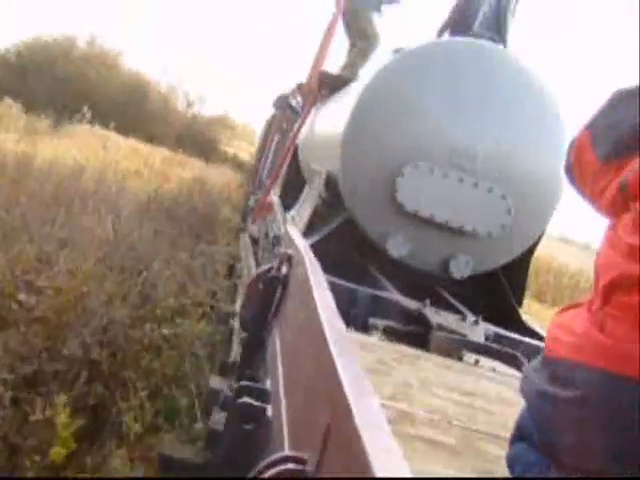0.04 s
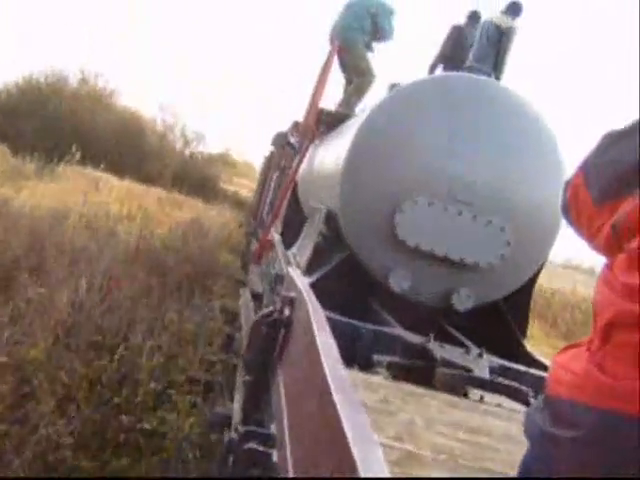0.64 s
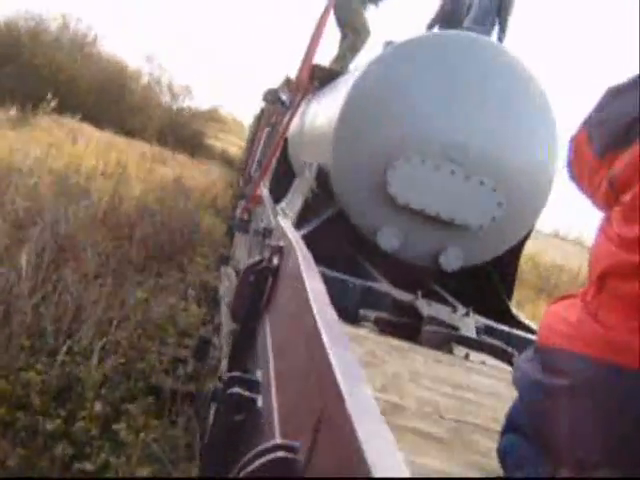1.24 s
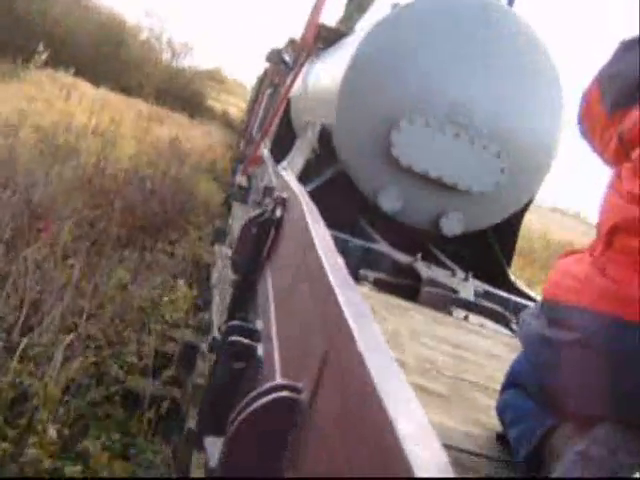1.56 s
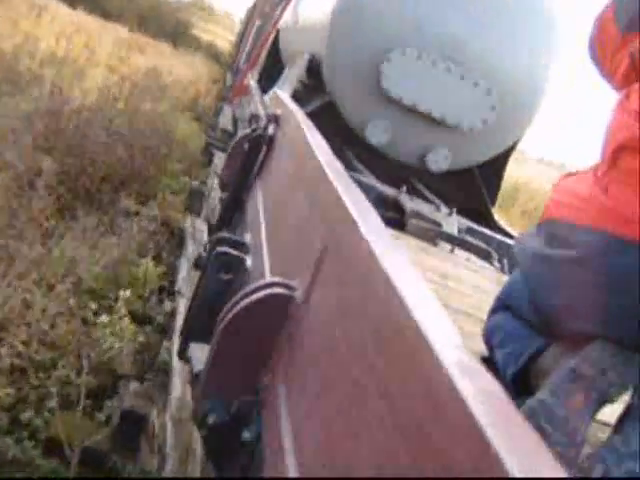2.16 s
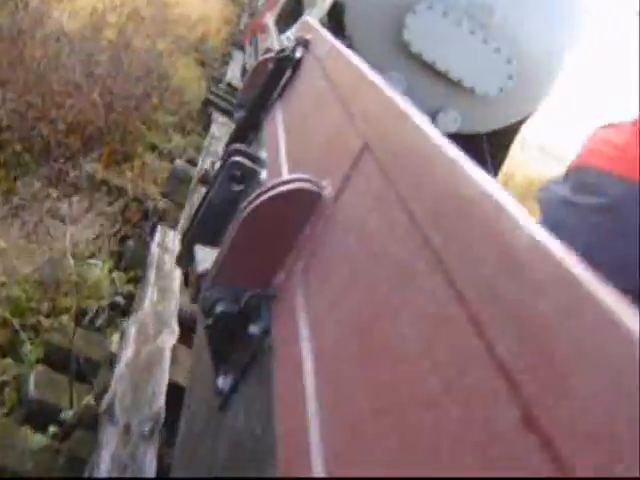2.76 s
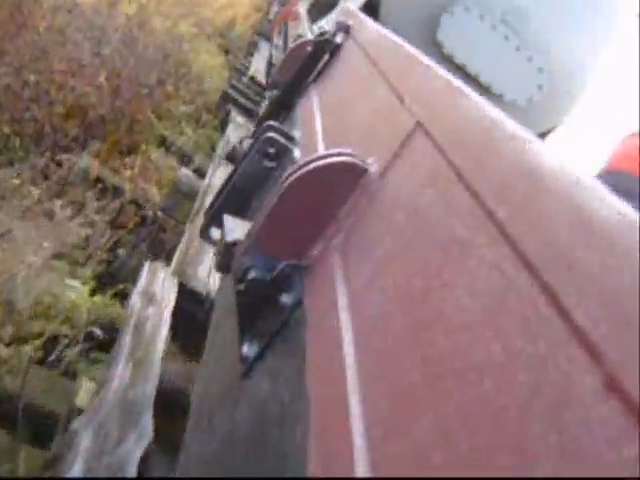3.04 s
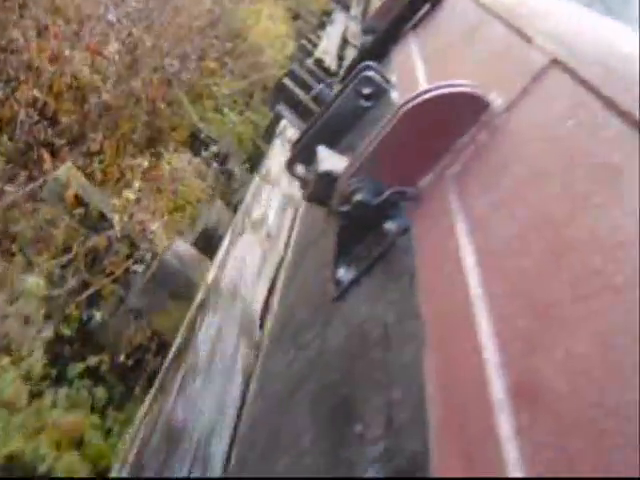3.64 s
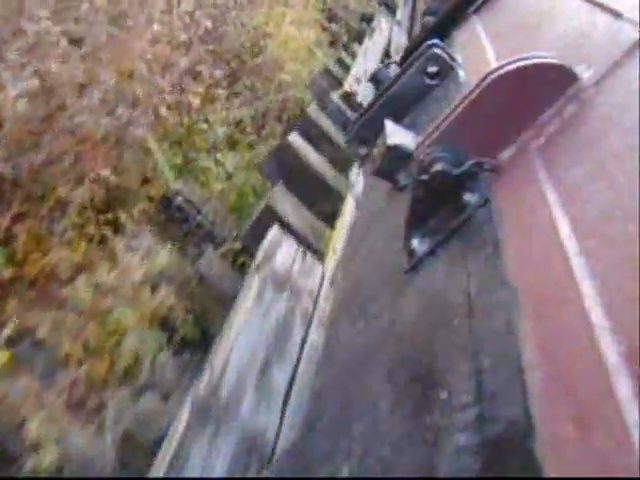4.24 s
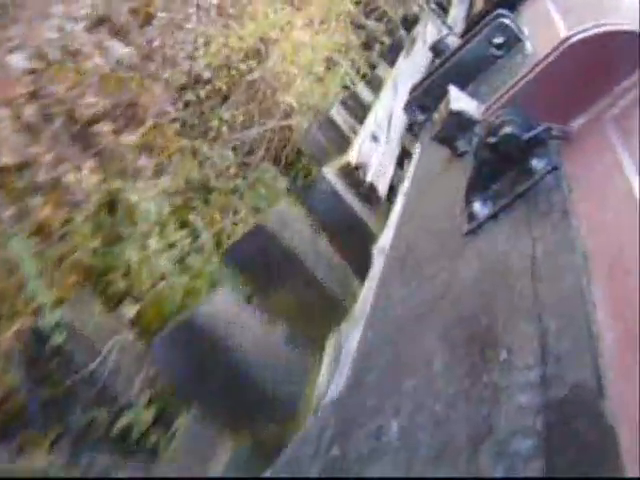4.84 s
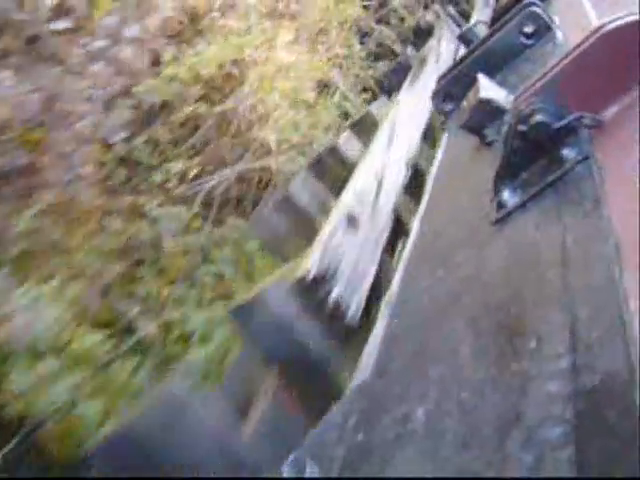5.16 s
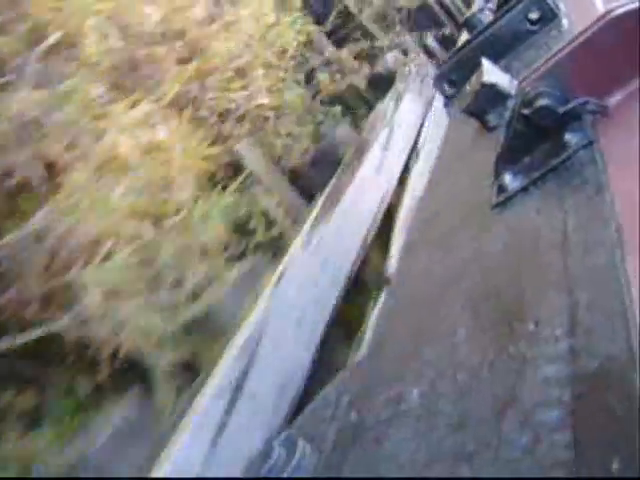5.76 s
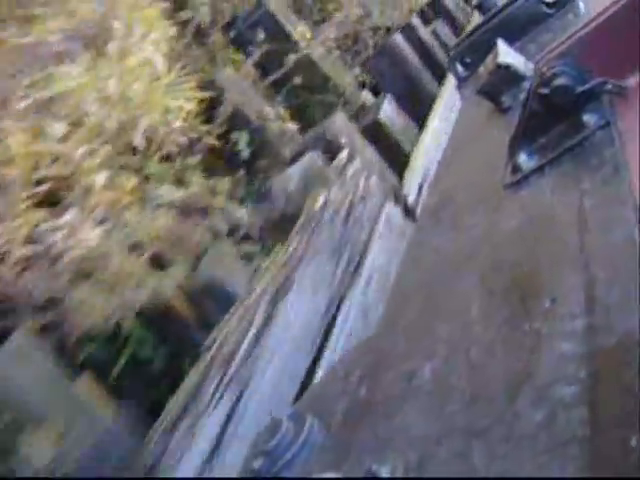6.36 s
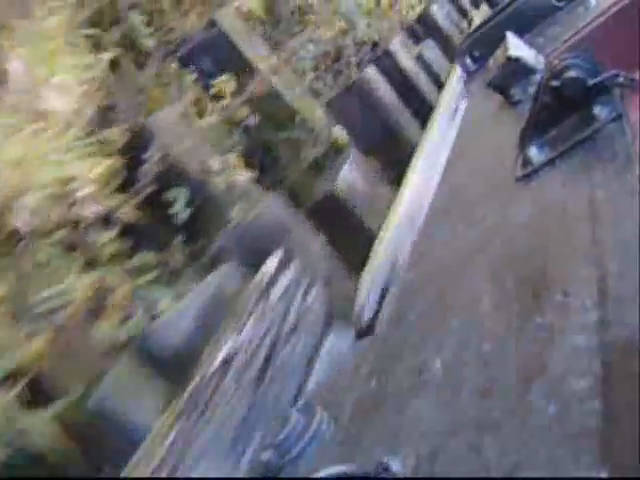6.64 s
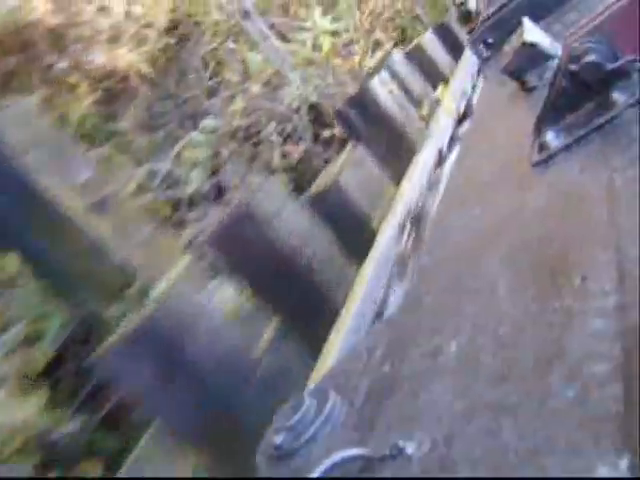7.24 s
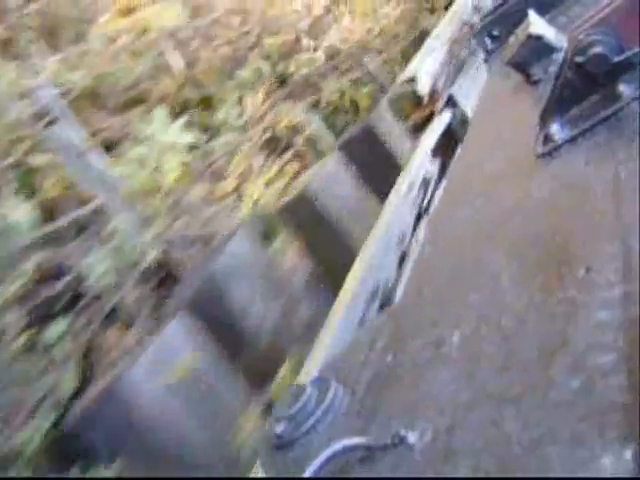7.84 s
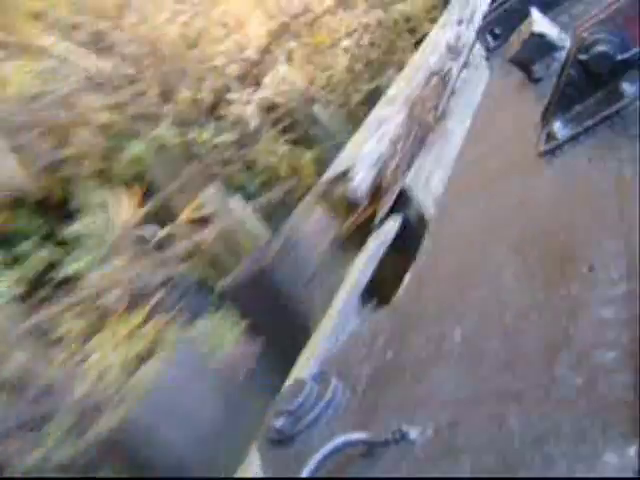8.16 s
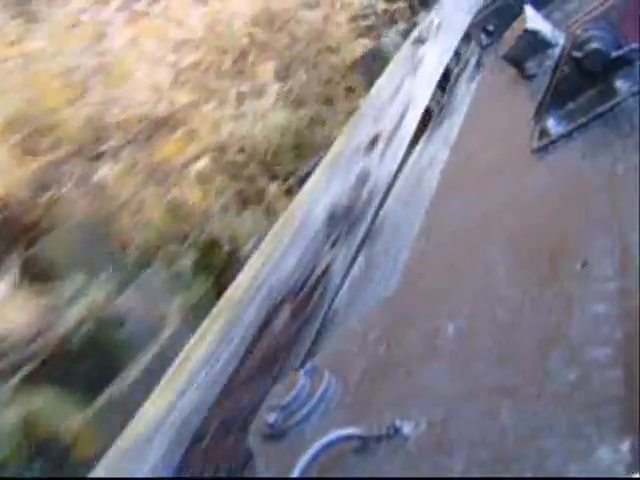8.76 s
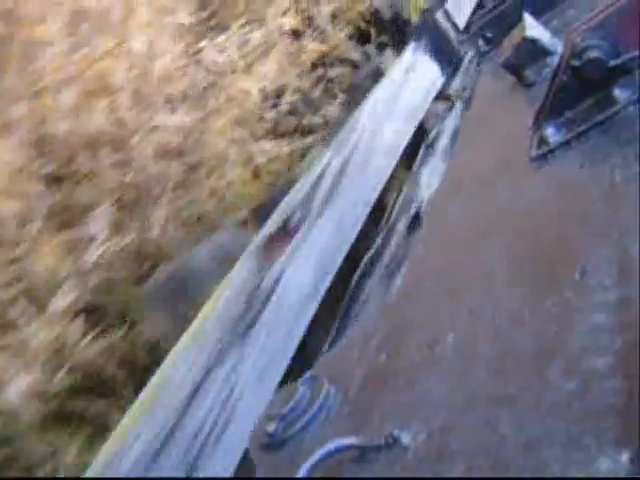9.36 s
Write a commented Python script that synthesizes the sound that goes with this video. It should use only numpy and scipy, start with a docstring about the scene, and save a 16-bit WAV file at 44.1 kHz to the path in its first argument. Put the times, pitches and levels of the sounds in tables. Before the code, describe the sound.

An open wagon rumbles loudly along worn rails, with a gritty wheel hiss, rattling steel fittings and a few sharp clicks.

```python
"""A heavy rumble, with hissing rails and chattering steel: an open wagon on a worn narrow-gauge line,
heard from its side wall above the wheels. Bumps in the rail force the wheels, frame and deck into
vibration, crushed grit hisses, flanges squeal thinly, and jolts make loose fittings ring in their modes.
A small camera's low-rate sample-and-hold adds a fizz to the rumble; a few sharp clicks cut through."""
import sys
import numpy as np
from scipy import signal
from scipy.fft import rfft, irfft
from scipy.io import wavfile
from scipy.ndimage import uniform_filter1d

SR = 44100
rng = np.random.default_rng(int(sys.argv[2]) if len(sys.argv) > 2 else 0)


def generate_wav(signal):
    """Clip the signal to [-1, 1] and save it as 16-bit WAV at the path in sys.argv[1]."""
    frames = np.transpose(np.atleast_2d(signal))
    scaled = np.clip(frames, -1, 1) * 32767
    pcm = np.round(scaled).astype(np.int16)
    wavfile.write(sys.argv[1], SR, pcm)


N = 423360
TIME = np.arange(N) / SR
HOLD = 4  # output samples per held sample

# modes of the loose steel fittings: (frequency [Hz], bandwidth [Hz], relative level [dB])
FITTING_MODES = [(970, 43, 19), (1250, 91, 10), (2360, 70, 11.5), (2500, 57, -6), (2650, 60, 4),
                 (2890, 75, 7), (4000, 76, 5), (4280, 150, 4), (4790, 150, -0.5)]


def gain_of(db):
    """Amplitude ratio of a level in decibels."""
    return 10 ** (np.asarray(db) / 20)


def unit_rms(x):
    """Normalisation to an rms of 1."""
    return x / np.sqrt(np.mean(x ** 2) + 1e-20)


def envelope(curve):
    """Gain at every sample, interpolated in decibels along a level curve."""
    times, levels = np.transpose(curve)
    return gain_of(np.interp(TIME, times, levels))


def swell(s, half_s):
    """A Gaussian envelope of height 1 around time s."""
    out = np.zeros(N)
    near = slice(max(round((s - 3 * half_s) * SR), 0), round((s + 3 * half_s) * SR))
    out[near] = np.exp(-((TIME[near] - s) / half_s) ** 2)
    return out


def add(mix, s, sound):
    """Superposition: a short sound joins the mix at time s."""
    part = mix[round(s * SR):][:len(sound)]
    part += sound[:len(part)]


def wander(slow_hz, fast_hz):
    """Random modulation of rms 1: a sum of slow sines with random phases."""
    t = TIME[::128]
    rates = np.geomspace(slow_hz, fast_hz, 40)
    waves = sum(np.sin(2 * np.pi * (hz * t + rng.random())) / np.sqrt(hz) for hz in rates)
    return np.interp(TIME, t, unit_rms(waves))


def impacts(per_s, spread_db):
    """Shot noise of rms 1: a Poisson train of impulses of unequal size."""
    size = gain_of(spread_db * np.minimum(rng.exponential(1, N), 4))
    return unit_rms(size * rng.choice([-1., 1.], N) * (rng.random(N) < per_s / SR))


def colour(x, spectrum):
    """Spectral shaping at unit mean power gain, falling 20 dB per octave beyond the spectrum's ends."""
    hz, db = np.transpose(spectrum)
    octave, points = np.log2(np.fft.rfftfreq(N, 1 / SR) + 1), np.log2(hz)
    outside = abs(octave - np.clip(octave, points[0], points[-1]))
    response = gain_of(np.interp(octave, points, db) - 20 * outside)
    return irfft(rfft(x) * unit_rms(response), N)


def resonate(drive, modes):
    """Forced vibration: the summed response of damped modes, scaled to rms 1."""
    hz = np.fft.rfftfreq(N, 1 / SR)
    response = sum(gain_of(db) / (1 + 2j * (hz - centre) / width) for centre, width, db in modes)
    return unit_rms(irfft(rfft(drive) * response, N))


def strike(modes, tick_db, tick_s):
    """Free vibration: after a tick of contact noise, the modes of struck steel decay exponentially."""
    age = TIME[:SR // 2]
    tones = sum(gain_of(db - 60 * age / t60) * np.sin(2 * np.pi * hz * age) for hz, db, t60 in modes)
    return tones + gain_of(tick_db) * rng.standard_normal(len(age)) * np.exp(-age / tick_s)


def rim_sizzle(idle_db=-67):
    """Friction drives the wheel rims' modes faintly, and harder whenever a flange leans on the rail."""
    # rim modes: (frequency [Hz], bandwidth [Hz], relative level [dB])
    rim_modes = [(2780, 28, 3), (3870, 45, 2), (3905, 40, 10), (4110, 22, 18), (4220, 55, 8),
                 (4955, 50, -15)]
    # flange rubs: (time [s], relative level [dB], half length [s])
    rubs = [(1.15, -68, .15), (2.0, -67, .3), (2.7, -63, .1), (4.65, -68, .15), (5.0, -68, .1),
            (5.28, -63, 0.037), (7.068, -50, 0.027), (8.43, -55, .025)]
    friction = gain_of(idle_db) + sum(gain_of(db) * swell(s, half_s) for s, db, half_s in rubs)
    return resonate(rng.standard_normal(N), rim_modes) * friction


def flange_squeal(waver=0.005, flutter_db=2.5):
    """Stick-slip: a slipping flange makes one of the close rim modes sing in thin, rough spells."""
    # slips: (time [s], level [dB], half length [s], frequency [Hz])
    slips = [(1.87, -59, .09, 4150), (2.1, -64, .04, 4215), (2.22, -62, .06, 4200), (2.42, -63, .08, 4270),
             (2.92, -61, .05, 4280), (3.5, -65, .15, 4115), (4.287, -62, .04, 4270), (4.47, -63, .04, 4270),
             (4.64, -63, .08, 4130), (4.77, -63, .06, 4245), (5.28, -65, .05, 4240),
             (7.07, -63, .035, 4140)]
    bent_time = np.cumsum(1 + waver * wander(20, 160)) / SR
    tones = sum(gain_of(db) * swell(s, half_s) * np.sin(2 * np.pi * hz * bent_time)
                for s, db, half_s, hz in slips)
    return np.sqrt(2) * tones * gain_of(flutter_db * wander(6.6, 30))


def rail_hiss(jolt):
    """Contact noise: rust and grit hiss under the treads, small parts chink and the rims sizzle."""
    # steel rolling on steel: (time [s], relative level [dB])
    contact = [(0, -51.5), (0.9, -49), (1.7, -46.5), (2.1, -48), (2.3, -50.5), (2.7, -48.5), (3.9, -53.5),
               (5.0, -51), (7.6, -49), (8.7, -49.5), (9.6, -48)]
    # rail spectrum: (frequency [Hz], relative density [dB])
    rail_spectrum = [(700, -16), (1400, 6), (1850, 2.5), (2300, 6.5), (2600, 8), (2900, 0.5), (3300, -5),
                     (3900, -4), (4600, -8), (5500, -9)]
    hiss = colour(impacts(7000, spread_db=1.0), rail_spectrum)
    chinks = resonate(impacts(60, spread_db=1.5), FITTING_MODES) * gain_of(-6.0)
    return ((hiss + chinks) * envelope(contact) + rim_sizzle()) * gain_of(1.3 * jolt)


def clicks(dip_db=-3.0, dip_s=0.00041):
    """Band-limited impulses: dry needles one held sample wide, each in a brief dip of opposite sign."""
    # clicks: (time [s], relative level [dB])
    needles = [(2.6558, -19), (3.5620, -20.5), (3.6614, -23), (5.7502, -4.5), (7.3196, -21)]
    out = np.zeros(N)
    for s, db in needles:
        offset = np.arange(N) - HOLD * round(s * SR / HOLD)
        needle = np.sinc(offset / HOLD)
        dip = gain_of(dip_db) * np.exp(-(offset / SR / dip_s) ** 2)
        out += gain_of(db) * (needle - dip)
    return out


def clinks(bounce_s=0.011, bounce_db=-2):
    """Impact and rebound: pins and chain links tap their seats and bounce once, each at its own pitch."""
    # taps: (time [s], relative level [dB], pitch [Hz])
    taps = [(0.0405, -41, 2600), (0.4289, -40, 2410), (0.5671, -38, 2410), (0.6194, -37, 2600),
            (0.8094, -38, 2310), (0.9153, -39, 2370), (0.9494, -46, 2210), (1.1583, -38, 2345),
            (1.504, -36, 2360), (1.5878, -35, 2240), (1.6094, -38, 1990), (1.9465, -40, 1970),
            (2.2094, -48, 2500), (2.7127, -38, 2560), (2.9085, -36, 2290), (2.966, -45, 2430),
            (4.3071, -40, 2230), (4.8332, -38, 2390), (4.9994, -43, 2590), (5.0594, -40, 2620),
            (5.3572, -36, 2510), (5.499, -38, 2590), (5.899, -37, 2440), (6.2442, -35, 2610),
            (6.4123, -37, 2350), (6.5345, -38, 2150), (6.675, -40, 2500), (6.693, -36, 2420),
            (7.3597, -38, 2400), (7.444, -33, 2340), (7.6266, -37, 2810), (7.8294, -38, 2670),
            (7.9077, -35, 2320), (8.6047, -37, 2270), (8.9256, -37, 2350)]
    # modes of a pin or link: (ratio to pitch [1], relative level [dB], t60 [s])
    pin_modes = [(0.89, -15, 0.034), (0.999, -5, 0.063), (1.11, -9.5, 0.046), (1.23, -15, .04),
                 (1.62, -17, 0.027)]
    out = np.zeros(N)
    for s, db, hz in taps:
        modes = [(ratio * hz, level, t60) for ratio, level, t60 in pin_modes]
        add(out, s, gain_of(db) * strike(modes, tick_db=-5.5, tick_s=0.0036))
        rebound_s = s + bounce_s * rng.uniform(0.73, 1.4)
        add(out, rebound_s, gain_of(db + bounce_db) * strike(modes, tick_db=-4, tick_s=0.0033))
    return out


def clanks(crunch_db=-0.5, crunch_s=0.039):
    """Impact excitation: steel thrown against its stop gives a crunch, a knock and a short bright ring."""
    # blows: (time [s], relative level [dB], share of the full ringing time [1])
    blows = [(5.3134, -46, 0.28), (5.5513, -46, .5), (6.845, -43, 0.92), (7.177, -35, 0.83),
             (7.708, -41.5, .4), (8.3285, -41, 0.54), (9.061, -46, 0.67), (9.4743, -45.5, 0.98)]
    # modes of the steel part: (frequency [Hz], relative level [dB], full t60 [s])
    steel_modes = [(910, 15, 0.06), (1030, 5, .05), (1090, 9.5, 0.05), (1270, -5, .065), (2220, -3, .1),
                   (2570, 3, .12), (2708, -7, .14), (2910, -3.5, .16), (2900, -20, .12), (3170, -18, .11),
                   (3920, -7, .1), (4650, -7, .06), (4940, -8, .08)]
    # crunch of rust and grit: (frequency [Hz], relative density [dB])
    grit_spectrum = [(600, -6), (1000, 5), (1600, -6), (2400, -2), (3300, -4), (4300, -9), (5500, -10)]
    ringing, crunch, age = np.zeros(N), np.zeros(N), TIME[:SR // 2]
    for s, db, share in blows:
        modes = [(hz, level, t60 * share) for hz, level, t60 in steel_modes]
        add(ringing, s, gain_of(db) * strike(modes, tick_db=1, tick_s=0.007))
        add(crunch, s, gain_of(db + crunch_db) * np.exp(-age / (crunch_s * share)))
    return ringing + crunch * colour(impacts(2000, spread_db=2.0), grit_spectrum)


def rattles(rise_s=0.0083, decay_s=0.05):
    """Repeated collisions: jolted latches and hinges chatter in bursts that ring the steel's modes."""
    # bursts: (time [s], relative level [dB])
    bursts = [(0.205, -36), (0.27, -39), (1.642, -39), (2.083, -40), (2.639, -36), (3.5, -38.5),
              (5.545, -40), (5.903, -40), (6.834, -33), (7.052, -35.5), (7.105, -36), (7.18, -33),
              (7.334, -38), (7.685, -36), (8.406, -37), (9.063, -39), (9.455, -35), (9.564, -37)]
    # spectrum of the fittings: (frequency [Hz], relative density [dB])
    fitting_spectrum = [(300, -20), (800, -5), (1500, 9), (1850, 9.5), (2200, 12), (2800, 12), (3300, 1),
                        (4200, -3), (5500, -12)]
    shake, age = np.zeros(N), TIME[:SR // 2]
    burst = (1 - np.exp(-age / rise_s)) * np.exp(-(age / decay_s) ** 2)
    for s, db in bursts:
        add(shake, s - rise_s, gain_of(db) * burst)
    collisions = impacts(3000, spread_db=3.0)
    clatter = gain_of(-6.5) * colour(collisions, fitting_spectrum)
    ringing = gain_of(-9.5) * resonate(collisions, FITTING_MODES)
    return shake * (clatter + ringing)


def groans(waver=0.011):
    """Frequency-modulated tone bursts: hollow notes and squeaks swell out of the rolling noise and die."""
    # tones: (time [s], pitch [Hz], level [dB])
    notes = [(1.171, 167.6, -32), (1.85, 3395, -52), (2.39, 1127, -38), (2.636, 216, -23), (3.0, 524, -25),
             (3.45, 220, -26), (3.851, 184.6, -25.5), (5.326, 643, -26), (5.37, 1850, -49),
             (6.42, 1144, -41), (6.777, 215.6, -23), (6.859, 644, -25), (8.077, 1030, -38),
             (8.44, 842, -31), (9.512, 4800, -53), (9.575, 4880, -51)]
    out = np.zeros(N)
    for s, hz, db in notes:
        half_s = 0.044 * (610 / hz) ** 0.62  # higher tones die sooner
        t = np.arange(-3 * half_s, 3 * half_s, 1 / SR)
        drift = unit_rms(uniform_filter1d(rng.standard_normal(SR), size=500))[:len(t)]
        tone = np.sqrt(2) * np.sin(2 * np.pi * np.cumsum(hz * (1 + waver * drift)) / SR)
        add(out, s + t[0], gain_of(db) * tone * np.exp(-(t / half_s) ** 2))
    return out


def body_boom():
    """Cavity resonance: small impacts keep the hollows of the wagon body sounding."""
    # hollows: (frequency [Hz], bandwidth [Hz], relative level [dB])
    hollows = [(531.3, 21, -7.5), (732, 8.4, -12.5)]
    # strength of the boom: (time [s], level [dB])
    boom_levels = [(0, -27), (1.5, -48), (2.2, -29.5), (3.0, -35), (5.0, -36.5), (6.0, -34.5), (7.6, -42),
                   (9.6, -31)]
    return resonate(impacts(600, spread_db=1.5), hollows) * envelope(boom_levels)


def body_drone(pitch_hz=235.4, width_hz=9.3, drift=0.022):
    """A time-varying resonator: the body's lowest hollow hums, its pitch drifting as the body flexes."""
    # strength of the drone: (time [s], level [dB])
    drone_levels = [(0, -34), (1.5, -36.5), (2.7, -34), (3.0, -38), (3.45, -35.5), (4.2, -32),
                    (4.55, -30.5), (5.0, -28), (5.5, -29), (5.9, -28.5), (8.3, -35), (9.6, -47)]
    cycles = np.cumsum(pitch_hz * (1 + drift * wander(0.7, 4))) / SR
    carrier = np.exp(2j * np.pi * cycles)
    pole = np.exp(-np.pi * width_hz / SR)
    # shifting down, low-passing and shifting back centres the resonance on the moving pitch
    hum = carrier * signal.lfilter([1 - pole], [1, -pole], impacts(600, spread_db=0.5) / carrier)
    return unit_rms(hum.real) * envelope(drone_levels)


def load_shift(x, depth_db=1.9):
    """Spectral modulation: as the load shifts, narrow bands swell and fade for about a tenth of a second."""
    spectra = signal.stft(x, nperseg=4096, noverlap=3072)[2]
    patches = uniform_filter1d(rng.standard_normal(spectra.shape), size=4, axis=0)  # along frequency
    patches = uniform_filter1d(patches, size=6, axis=1)  # along time
    gains = unit_rms(gain_of(depth_db * unit_rms(patches)))
    return signal.istft(spectra * gains, nperseg=4096, noverlap=3072)[1][:N]


def rumble(jolt):
    """Roughness excitation: rail bumps shake the wagon; the heavier the part, the less it feels a jolt."""
    # spectra of the vibrating parts: (frequency [Hz], relative density [dB])
    deck_spectrum = [(12, -32), (28, -25), (45, -18), (60, -28), (80, -16), (120, -0.5), (160, 0.5),
                     (210, -2.5), (330, -29)]
    spring_spectrum = [(15, -20), (30, -10), (45, -3), (65, -1), (90, 3.5), (120, -0.5), (170, -18)]
    frame_spectrum = [(100, -20), (150, -9.5), (190, -3.5), (260, -2), (340, -1.5), (480, -1.5), (600, -8),
                      (720, -12.5), (950, -47)]
    wheel_spectrum = [(400, -31), (540, -1), (660, -1), (800, -7), (1000, -23.5), (1250, -22), (1500, -40),
                      (2000, -49), (3500, -54)]
    tread_spectrum = [(620, 0.5), (820, 2.5), (1000, -1), (1250, -13.5), (1500, -20.5), (2000, -45)]
    # strength of each motion: (time [s], relative level [dB])
    sway = [(0, -29.5), (0.8, -27), (1.3, -24.5), (2.6, -27.5), (3.5, -27.5), (4.5, -27.5), (5.2, -29.5),
            (6.0, -27.5), (6.8, -32), (7.95, -26), (8.5, -30.5), (9.6, -30.5)]  # the deck sways
    heave = [(0, -31.5), (0.9, -32), (1.8, -27.5), (2.4, -32.5), (3.0, -32.5), (3.8, -40.5), (4.4, -32.5),
             (5.0, -38), (5.6, -33.5), (6.1, -31), (6.7, -37.5), (7.45, -35.5), (7.8, -40), (8.3, -34),
             (9.6, -39)]  # the springs flex over dips in the track
    roar = [(0, -29), (1.4, -32.5), (2.1, -31), (4.7, -28), (5.6, -25.5), (6.4, -31.5), (7.0, -29),
            (8.0, -35), (9.6, -31)]  # the wheels roar on rough stretches
    grind = [(0, -36), (1.0, -34.5), (2.2, -33.5), (3.0, -35.5), (3.5, -35.5), (3.9, -39), (4.5, -36),
             (6.2, -33), (6.5, -35), (7.3, -31), (8.0, -33), (8.5, -32), (9.6, -35)]  # the treads grind on pitted rail
    lean = [(3.4, -21.5), (8.1, -20.03)]  # the frame grows louder as the listener leans over the side
    deck = colour(impacts(3000, spread_db=1.0), deck_spectrum) * envelope(sway)
    springs = colour(impacts(1500, spread_db=3.5), spring_spectrum) * envelope(heave)
    frame = colour(impacts(4000, spread_db=1.5), frame_spectrum) * envelope(lean)
    wheels = colour(impacts(2500, spread_db=4.0), wheel_spectrum) * envelope(roar)
    treads = colour(impacts(2500, spread_db=3.5), tread_spectrum) * envelope(grind)
    jolted = frame * gain_of(0.6 * jolt) + wheels * gain_of(0.85 * jolt) + treads * gain_of(0.74 * jolt)
    return load_shift(springs + deck + jolted)


def scene():
    """Common modulation: uneven track jolts rumble and rail hiss together; all adds to a faint even hiss."""
    jolt = wander(5, 24)
    noise_floor = gain_of(-57.0) * rng.standard_normal(N)
    rolling = rumble(jolt) + body_boom() + body_drone() + groans() + rail_hiss(jolt) + flange_squeal()
    loose_steel = rattles() + clinks() + clanks()
    return (noise_floor + rolling + loose_steel + clicks())[None]


def record(dry, cutoff_hz=15400):
    """Spectral imaging: sample-and-hold mirrors the sound to either side of 11 kHz; a low-pass follows."""
    slow = signal.resample(dry, N // HOLD, axis=1)
    held = np.repeat(slow, HOLD, axis=1)
    low_pass = signal.firwin(511, cutoff_hz, window=("kaiser", 9), fs=SR)
    return signal.oaconvolve(held, low_pass[None], "same")


dry = scene()
out = record(dry)
generate_wav(out)
```